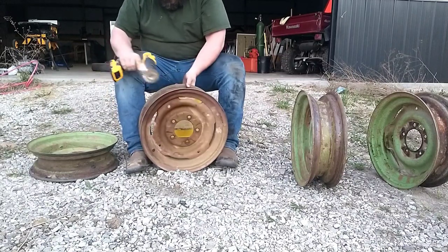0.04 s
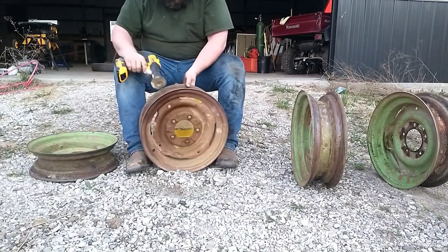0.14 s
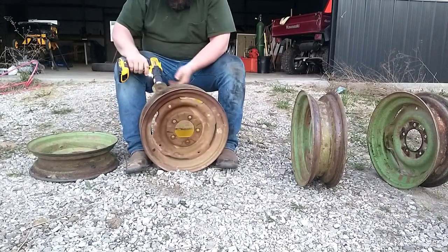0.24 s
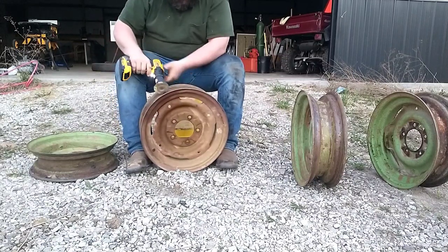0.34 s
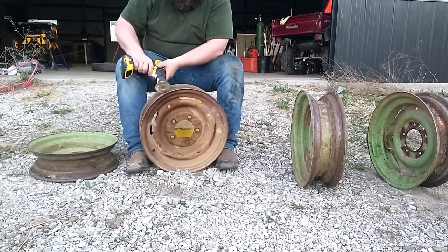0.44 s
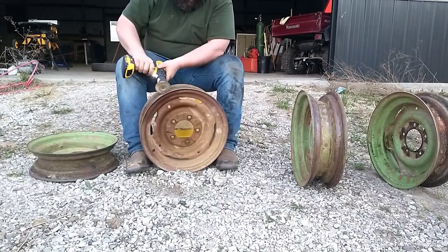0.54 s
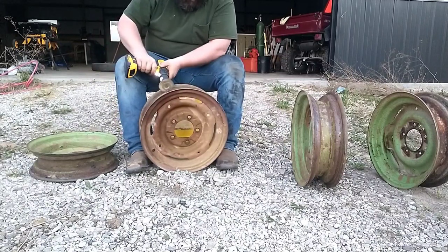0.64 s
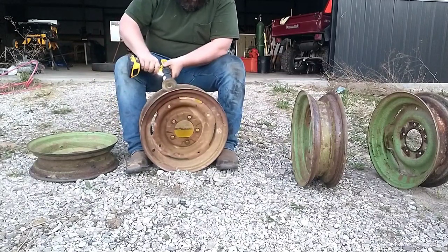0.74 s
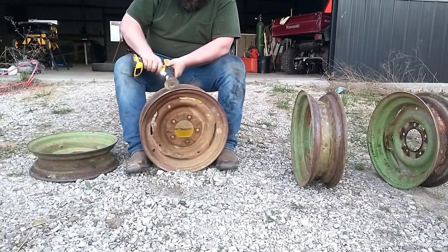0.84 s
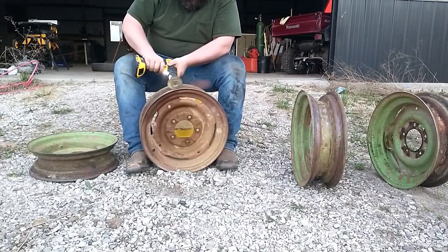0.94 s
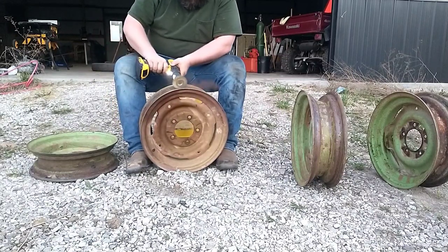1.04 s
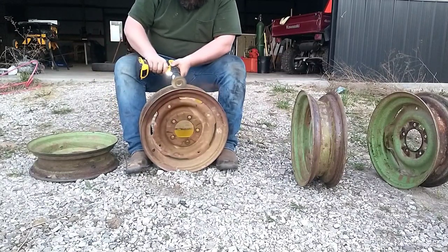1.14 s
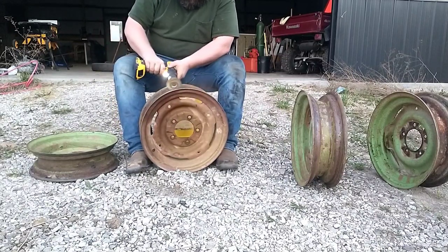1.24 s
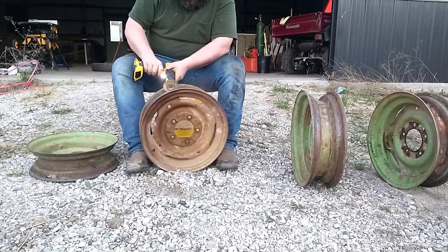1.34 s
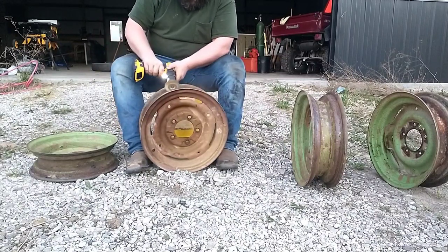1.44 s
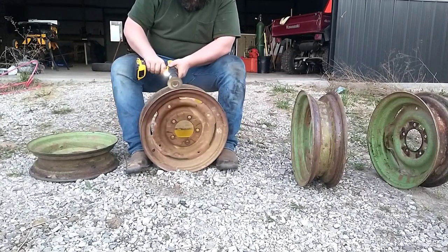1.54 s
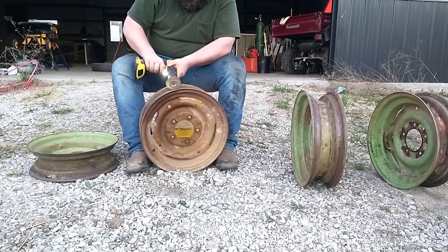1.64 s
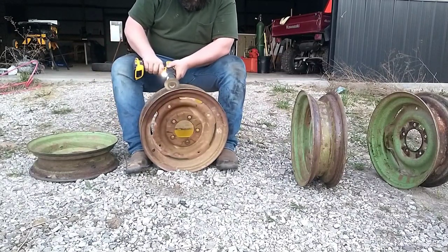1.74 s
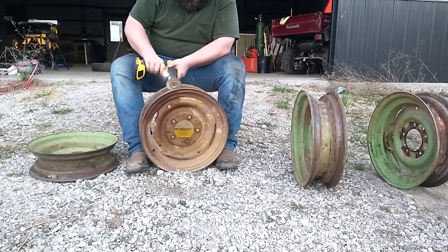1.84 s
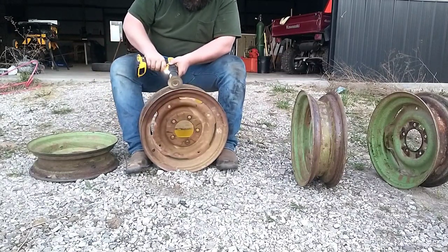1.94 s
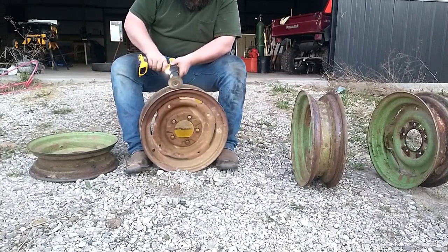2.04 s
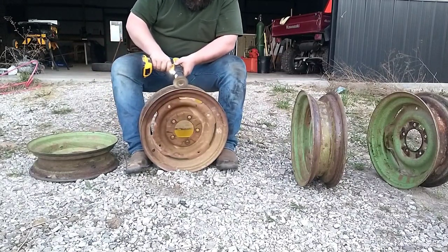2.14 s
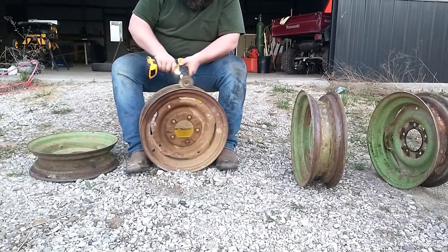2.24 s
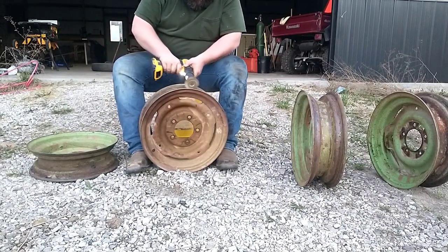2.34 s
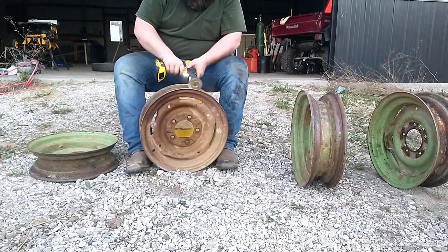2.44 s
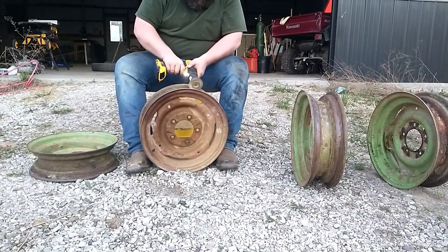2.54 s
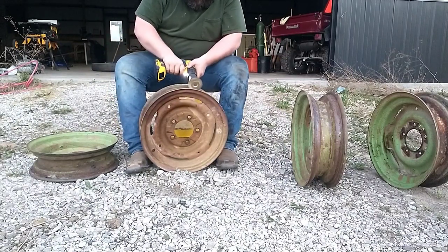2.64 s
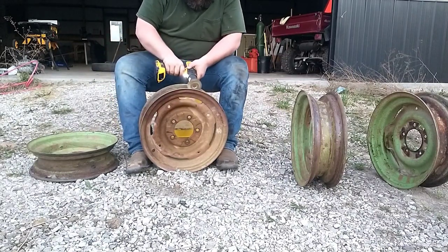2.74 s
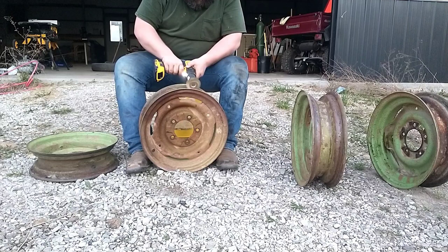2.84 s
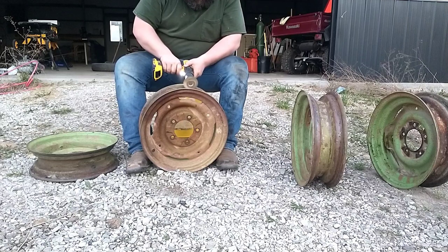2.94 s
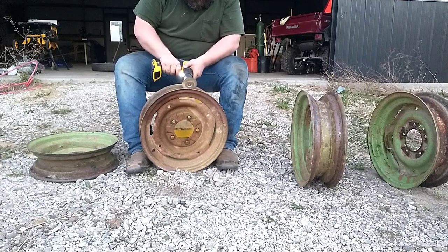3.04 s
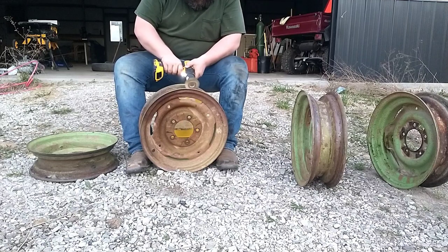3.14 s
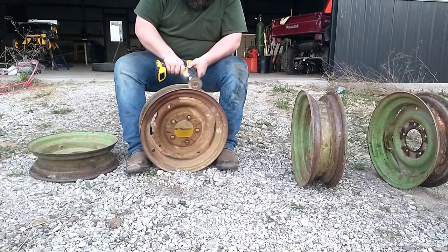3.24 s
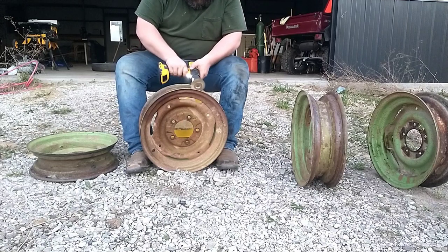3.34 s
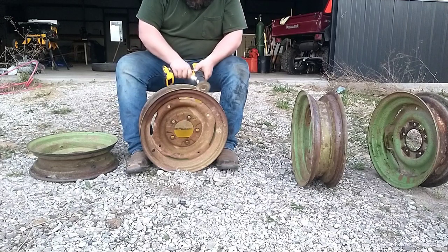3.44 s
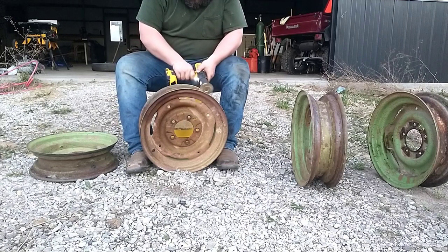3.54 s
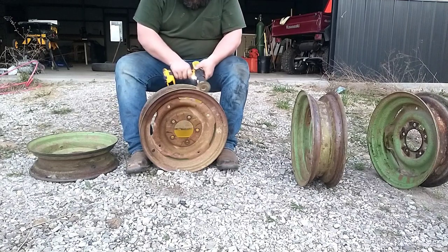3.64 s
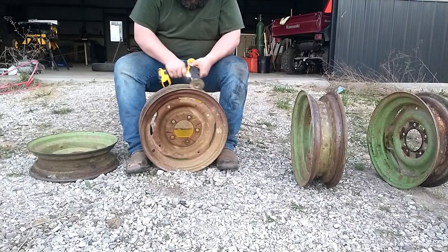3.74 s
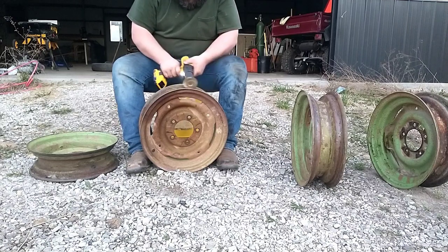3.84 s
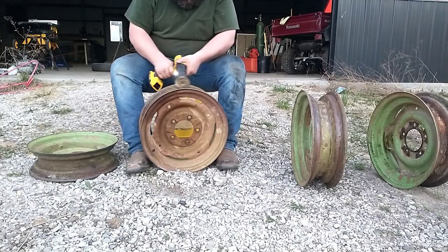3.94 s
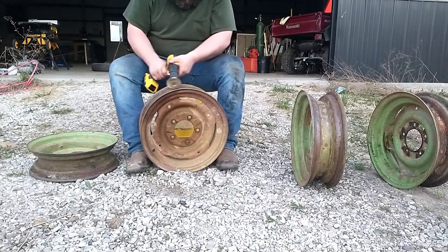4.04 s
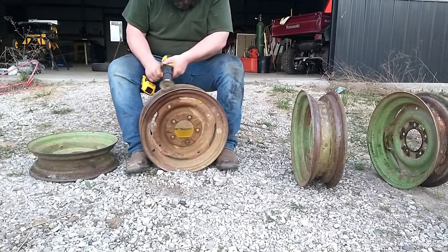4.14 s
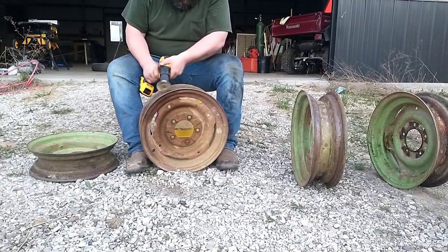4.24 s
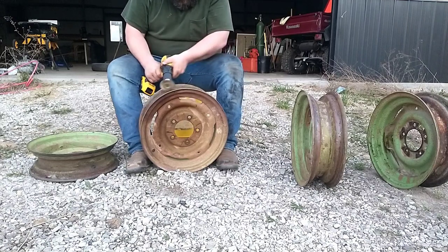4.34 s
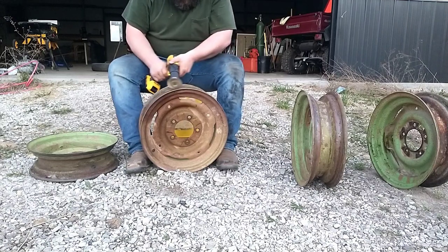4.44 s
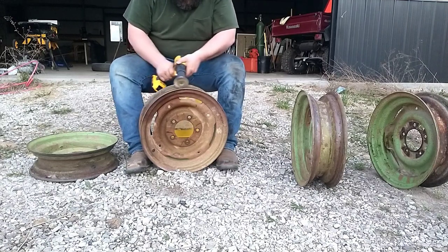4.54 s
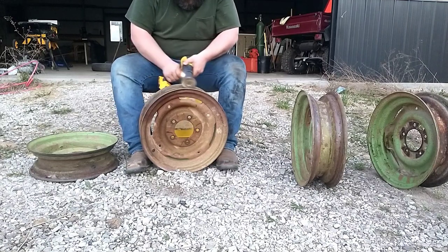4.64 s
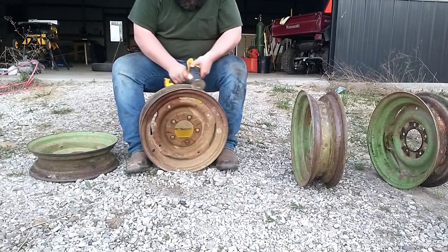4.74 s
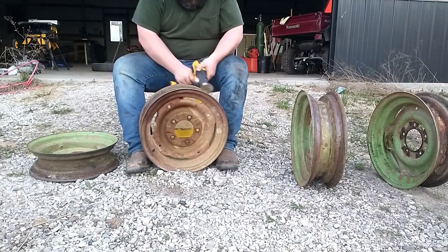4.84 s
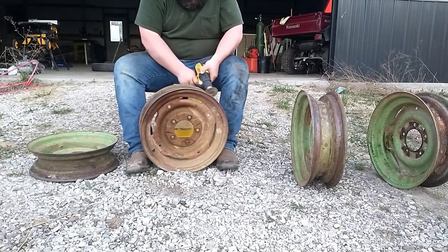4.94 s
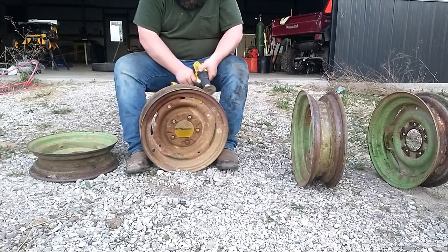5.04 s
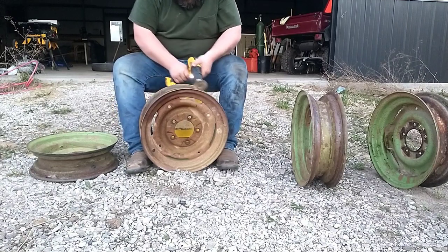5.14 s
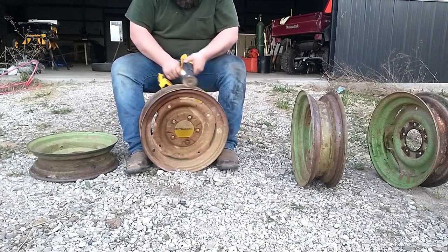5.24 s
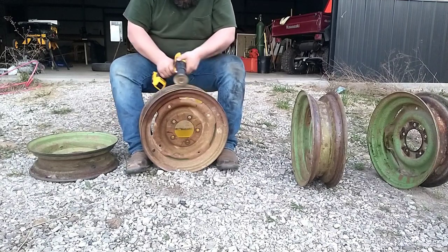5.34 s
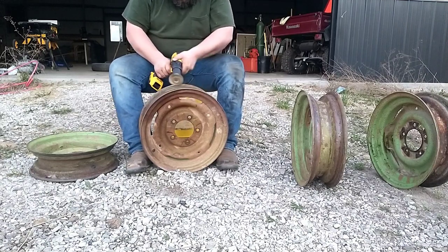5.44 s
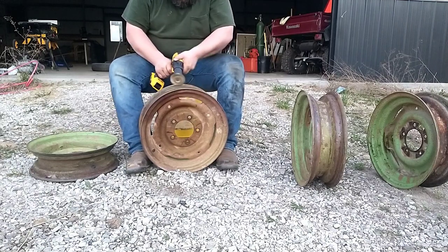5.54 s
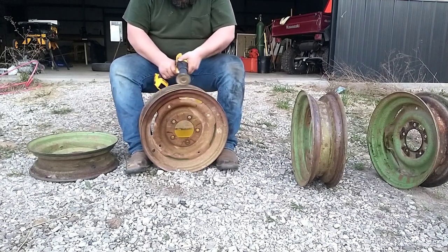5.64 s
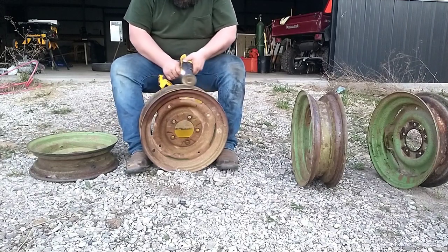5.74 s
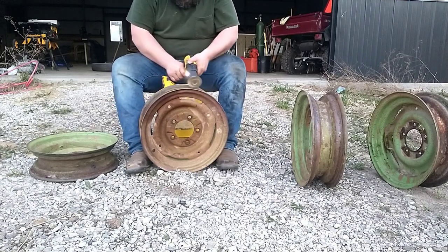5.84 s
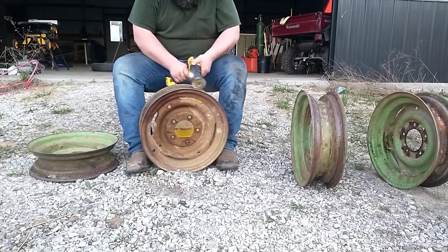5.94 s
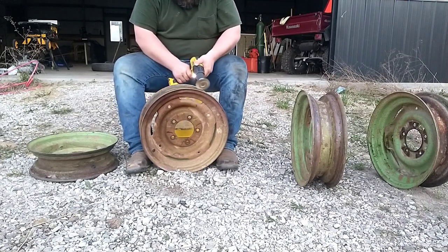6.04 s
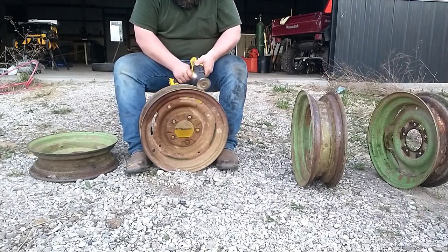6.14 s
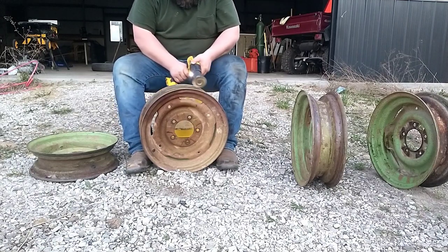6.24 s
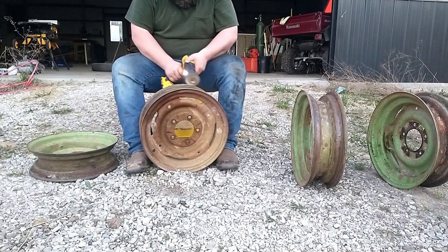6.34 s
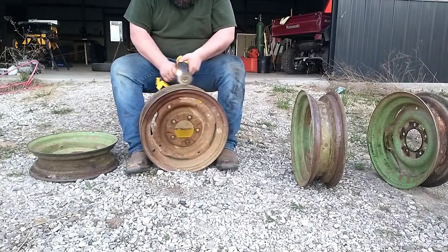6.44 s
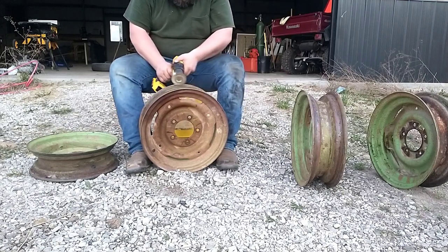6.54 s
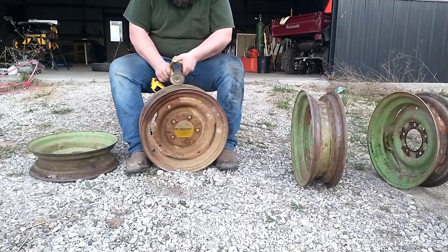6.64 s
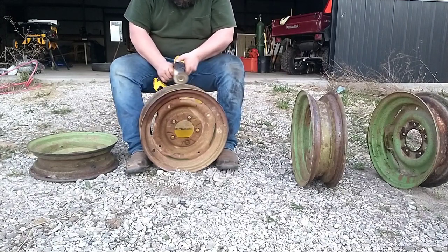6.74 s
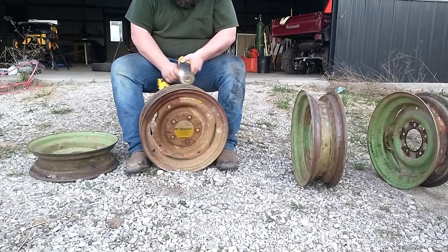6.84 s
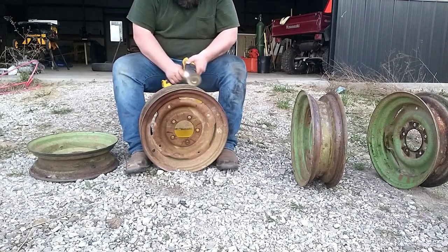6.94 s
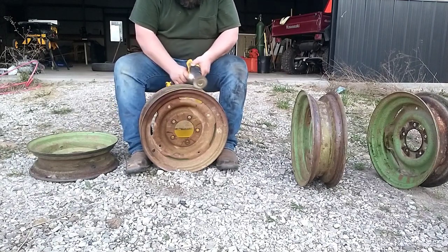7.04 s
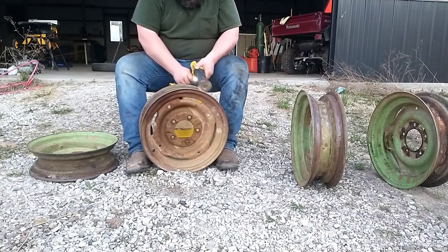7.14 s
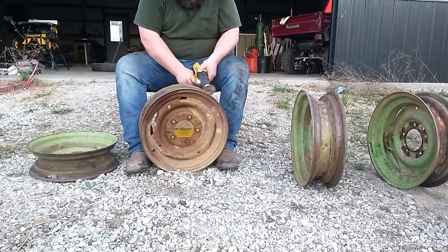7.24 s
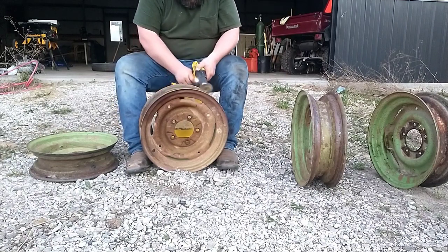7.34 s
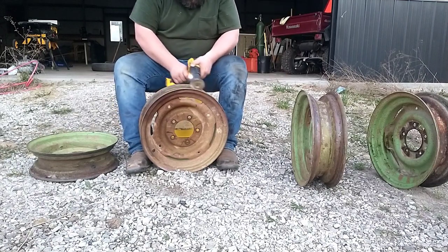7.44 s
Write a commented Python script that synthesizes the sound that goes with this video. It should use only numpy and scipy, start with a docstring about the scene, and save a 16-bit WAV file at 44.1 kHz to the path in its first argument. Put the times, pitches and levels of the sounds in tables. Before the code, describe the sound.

Brief metallic knocks, a trigger click, then a drill motor's high whine and harsh wire-bristle scratching on a steel rim, continuing to the end.

```python
"""A gravel yard in stereo: open-air murmur and a distant machine hum.
A wire brush knocks on a rusty steel wheel rim and sets its modes ringing; the trigger clicks.
A cordless drill's motor whines up, its tones riding the shaft, and sags as the brush loads it;
bristles scratch, as thousands of ticks shaped by spectrum, and keep the rim ringing.
A few more knocks fall early in the brushing; later, wind bumps the microphone as short low pulses."""
import sys
import numpy as np
from scipy import signal
from scipy.fft import rfft, irfft
from scipy.io import wavfile
from scipy.ndimage import uniform_filter1d

SR = 44100
rng = np.random.default_rng(int(sys.argv[2]) if len(sys.argv) > 2 else 0)


def persist_wave(psi):
    """Save psi, clipped to +-1, as 16-bit WAV."""
    counts = np.round(np.clip(psi, -1, 1) * 32767).astype(np.int16)
    wavfile.write(sys.argv[1], SR, np.atleast_2d(counts).T)


def boost_factor(decibels):
    """Convert a level in decibels to a linear amplitude factor."""
    exponent = np.asarray(decibels, float) / 20
    return 10 ** exponent


N = 329868
HZ = np.maximum(np.arange(N // 2 + 1) * SR / N, 1)   # frequency axis of a whole-length spectrum
TRIGGER_S = 0.616
CHUCK_PER_SHAFT = 0.0801   # chuck turns per shaft turn, through the gears

# speed the motor can hold against the brush: time_s, shaft_hz
LOADED_SPEED = [(.6, 313), (.93, 313), (1.04, 305.8), (1.15, 314.3), (1.36, 318.4), (1.62, 319.2),
                (1.67, 317.3), (1.82, 317), (2.03, 319.4), (2.14, 315.3), (2.26, 316.3), (2.52, 314.4),
                (2.66, 317.6), (2.73, 315.8), (2.95, 319.4), (3.14, 316.3), (3.3, 318.2), (3.44, 316.3),
                (3.7, 315.6), (3.77, 312.5), (3.98, 311.6), (4.07, 309.3), (4.19, 308.2), (4.37, 312.4),
                (4.54, 312), (4.73, 306.8), (4.8, 302.9), (4.87, 305.3), (4.98, 304.2), (5.15, 311.4),
                (5.3, 316), (5.56, 319), (5.66, 318.8), (5.8, 317.5), (5.85, 315.4), (6.15, 316.8),
                (6.34, 319), (6.52, 318.8), (6.8, 319.8), (6.89, 317.5), (7.13, 318.4), (7.34, 315.8),
                (7.48, 316)]
# weaker motor and gear tones, before the housing colours them: multiple of shaft rate, rms_db
WEAK_TONES = [(4, -36.5), (5, -40), (7, -46), (8, -45.5), (15, -34), (18, -31.5), (22, -43), (25, -34),
              (31, -23), (35, -43)]
# how the housing passes the weaker tones: pitch_hz, gain_db
HOUSING_GAIN = [(300, -33.5), (1000, -18), (1600, -6.5), (3000, -5.5), (6500, -0.5), (10000, -28.5),
                (11500, -14.5), (15000, -1)]
# tones that swell, one number each: multiple of shaft rate
WHINE_MULTIPLES = (10, 19, 20, 30, 16.05, 2)
# the same tones between swells, at full speed off the shell resonance: rms_db
WHINE_REST_DB = (-40, -36, -33.5, -43, -43.5, -65)
# swells as the tilting drill aims each tone at the listener, one list per tone:
# peak_s, peak_db, half_length_s
WHINE_SWELLS = [
    [(.97, -25.5, 0.26), (1.35, -19, 0.22), (1.6, -19.5, 0.21), (1.97, -19.5, 0.18), (2.26, -23.5, 0.11),
     (2.6, -23.5, 0.097), (2.92, -20, 0.14), (3.25, -20.5, 0.16), (2.4, -29, 1.1), (3.65, -22.5, 0.34),
     (3.97, -30, 0.13), (4.24, -28, 0.1), (4.46, -25.5, 0.15), (4.78, -27.5, 0.11), (5.2, -30, 0.33),
     (5.93, -30, 0.16), (6.28, -27, 0.33), (6.9, -52, .05), (7.25, -27.5, 0.67)],
    [(1.1, -22.5, 0.36), (1.46, -35, 0.11), (2.15, -25.5, 0.75), (2.44, -20.5, 0.14), (2.72, -21, .1),
     (2.91, -22, .09), (3.4, -18, 0.13), (3.83, -18, 0.23), (4.85, -19.5, 0.15), (5.07, -22, 0.16),
     (5.36, -22, 0.091), (5.87, -23, .07), (6.04, -16, 0.066), (6.32, -17.5, 0.27), (7.1, -23, 0.078),
     (7.28, -15, .08)],
    [(.825, -17, 0.027), (1.3, -26, 0.46), (1.9, -29, 0.066), (2.18, -25, 0.094), (2.62, -29, .05),
     (2.93, -28, 0.071), (3.2, -22.5, 0.03), (3.9, -28.5, 0.17), (4.33, -29.5, 0.33), (4.72, -26, 0.067),
     (5.0, -15, 0.12), (5.2, -24, 0.11), (5.6, -25.5, 0.12), (6.2, -20.5, 0.19), (6.39, -18.5, 0.073),
     (6.85, -24, 0.067), (7.18, -18, 0.074), (7.38, -20.5, 0.37)],
    [(.74, -29.5, 0.1), (.86, -28, 0.031), (1.15, -32, .2), (1.75, -35.5, 0.38), (2.15, -32, 0.12),
     (4.24, -27, 0.16), (4.5, -26.5, 0.21), (4.73, -27, 0.1), (5.5, -29.5, 0.29), (6.3, -40, 0.13),
     (6.67, -30.5, 0.025), (7.21, -36, 0.05)],
    [(.98, -29, 0.095), (2.4, -35, .3), (3.85, -29, 0.5), (4.75, -31, .2), (6.1, -30.5, .25),
     (7.2, -31, 0.16)],
    [(1.5, -59, .6), (3.15, -56.5, 0.97)],
]

# the hand on the drill: time_s, pressure_db, roll_db (from the brush's flank toward its tips)
HAND = [(.6, -2, 0), (.9, -0.5, 2.5), (1.3, 0, 0), (1.7, -0.5, -1), (2.2, 1, -1), (2.6, 0.5, 0.5),
        (2.95, -2, -1), (3.15, -0.5, -0.5), (3.5, -0.5, 2), (3.75, 1.5, 2), (4.1, 1.5, 0.5), (4.4, -0.5, 0),
        (4.75, 3, 1), (5.0, 4, 1), (5.55, -0.5, 0.5), (5.8, 1.5, 1.5), (6.3, 1.5, 0), (6.9, -1, 2.5),
        (7.2, 1.5, -.5), (7.48, 1.5, 3)]
# grind, scratch and sizzle in turn: rms_db before the hand, share of the roll (dB per dB),
# loss (dB per dB of missing speed)
BRISTLES = [(-33, -1.4, 3.5), (-26, 0.17, 2), (-26, 0.31, 1.5)]
# the plate's dull grind: pitch_hz, density_db (per Hz, relative)
GRIND_SPECTRUM = [(150, -21), (330, -49), (700, -24), (930, -20), (1150, -1), (1800, 3.5), (2400, 4.5),
                  (3000, 2), (4200, -10)]
# the bristle scratch: pitch_hz, density_db (per Hz, relative)
SCRATCH_SPECTRUM = [(2000, -48), (3000, -3.5), (4000, -0.5), (5000, 3.5), (6000, 2.5), (7000, -1.5),
                    (8500, -50)]
# the fine sizzle of tips: pitch_hz, density_db (per Hz, relative)
SIZZLE_SPECTRUM = [(5500, -30), (7200, 1), (8000, 1.5), (9500, -1), (10800, -2), (11500, -7.5), (13000, -7),
                   (15600, -8.5)]

# modes of the steel rim: pitch_hz, level_db (relative), t60_s
RIM_MODES = [(425, -24, .3), (608, -22, .4), (850, -21, .2), (1061, -7, .3), (1087, -3, .24), (1249, 0, .3),
             (1311, -3, .24), (1545, -2, .2), (1728, -10, .3), (1968, -9, .35), (2155, -3, .28),
             (2225, -7, .3), (2266, -11, .3), (2399, -6, .3), (2495, -4, .25), (2745, -6, .25),
             (2885, -10, .25), (3386, -2, .2), (3505, -8, .25), (3595, -9, .25), (3774, -8, .2),
             (4016, -7, .2), (4441, -6, .18), (4740, -7, .2), (5216, -10, .18), (5523, -8, .18),
             (6982, -9, .15), (7400, -9, .15)]
# the contact wanders round the rim: time_s, share_db (of the grind that feeds the modes),
# lean to the high modes (dB per octave)
CONTACT = [(.6, -43.5, -8), (.9, -27, -2.5), (1.3, -39.5, 4), (2, -37, -2), (2.8, -48, 11), (3.6, -38, 4),
           (4.4, -39, 1), (5.2, -36, 1.5), (5.9, -36, 4), (6.6, -35, 3), (7.48, -33.5, -1)]
# knocks and chatters on the rim, trigger click among them: start_s, level_db, length_s,
# low_hz, high_hz (band of the contact)
KNOCKS = [(.002, -43, 0.018, 735, 3840), (0.02, -37, 0.027, 1120, 1600), (0.155, -58, 0.031, 1000, 2600),
          (0.404, -72.5, 0.037, 870, 7060), (0.446, -48.5, 0.006, 1010, 11900),
          (0.615, -53, 0.0047, 700, 7000), (1.515, -37, 0.03, 407, 3080), (1.547, -32, 0.026, 1890, 5800),
          (1.559, -39, 0.018, 865, 3050)]

# open-air murmur: pitch_hz, density_db (per Hz, relative)
YARD_SPECTRUM = [(25, -36), (40, -15), (55, 0), (90, 8), (150, 2), (250, -6.5), (500, -7.5), (750, -7.5),
                 (1000, 1), (1400, -26), (2200, -17), (4000, -24.5), (7000, -25), (15500, -26.5)]
# open-air murmur: time_s, level_db
YARD_LEVEL = [(0, -51), (1.5, -48.5), (3, -47.5), (4.5, -49), (6, -50.5), (7.48, -49)]
# far machine hum: time_s, level_db
HUM_LEVEL = [(0, -56), (2.2, -69.5), (3.1, -55), (4.2, -50.5), (5.5, -52), (6.0, -69), (7.48, -67)]
# wind on the microphone: start_s, level_db (louder side), pitch_hz, left over right (dB)
WIND_BUMPS = [(2.559, -36, 88.8, -15), (2.716, -36, 108, 3), (3.082, -22.5, 156, -30),
              (3.149, -32, 97, -17), (3.327, -28, 88.8, 22), (3.493, -21, 108, -29),
              (3.987, -31, 89.6, -11), (6.386, -35, 105, -6.0), (7.052, -30.5, 104, -16)]

# stereo phase of the drill, brush and rim, left against right by pitch: pitch_hz, phase (radians)
STEREO_PHASE = [(100, -10), (450, 1.1), (1200, 0.68), (2500, 1), (3000, 0.56), (3500, 1.3), (5000, 1.82),
                (6050, 2.5), (6350, 0.5), (7300, -1.9), (15000, 3.5)]
# stereo level of the drill, brush and rim, left over right by pitch: pitch_hz, difference_db
STEREO_LEVEL = [(300, -4), (1100, 1), (2500, -0.5), (3500, -2), (5500, 0), (7300, 2.5), (8500, 3),
                (9500, 11), (10700, 1.5), (11500, 2), (14000, 7)]
# power share of noise common to both channels: pitch_hz, likeness (0 to 1)
LIKENESS = [(30, 0.6), (90, 1), (450, 0.65), (800, 0.46), (1300, 1), (2500, 1), (4000, 0.4), (5800, 0.67),
            (7000, 0.06), (8000, 0.14), (15000, 0)]


def motor():
    """Commutator, fan and gear tones ride the shaft; the off-centre chuck swings load and speed once a turn."""
    shaft_hz = shaft()
    turns = np.cumsum(shaft_hz * (1 + 0.00049 * drift(39.0))) / SR
    chuck = 2 * np.pi * CHUCK_PER_SHAFT * turns
    wobble = turns + 0.0034 * boost_factor(0.77 * drift(4.5)) * np.sin(chuck)
    effort_db = 40 * np.log10(shaft_hz / shaft_hz.max())

    tones = []
    for multiple, rest_db, swells in zip(WHINE_MULTIPLES, WHINE_REST_DB, WHINE_SWELLS):
        # the motor shell booms as a rising tone passes its resonance: 2150 Hz, 190 Hz half width
        shell_db = 15 * np.exp(-((multiple * shaft_hz - 2150) / 190) ** 2)
        tones.append((multiple, swelling(rest_db, swells) + 1.9 * effort_db + shell_db))
    for multiple, rms_db in WEAK_TONES:
        housing_db = at_hz(HOUSING_GAIN, multiple * shaft_hz)
        tones.append((multiple, rms_db + 1.15 * effort_db + housing_db + 2.4 * drift(6.0)))

    # the tones stutter more while the motor is still gathering speed
    flicker_db = np.minimum(1.3 - 0.5 * effort_db, 3.5)
    whine = 0
    for multiple, level_db in tones:
        level_db = level_db + flicker_db * drift(18)
        start, throb_start = rng.uniform(0, 2 * np.pi, 2)
        throb = 1 + 0.0074 * multiple * np.cos(chuck + throb_start)
        tone = np.sqrt(2) * np.sin(2 * np.pi * multiple * wobble + start)
        whine = whine + boost_factor(level_db) * throb * tone
    speed_db = effort_db / 2
    return whine * (np.arange(N) > TRIGGER_S * SR), turns, speed_db


def shaft():
    """Turns per second: an exponential spin-up from the trigger toward the loaded speed."""
    spin_up_s = 0.066   # time constant
    since = np.maximum(np.arange(N) / SR - TRIGGER_S, 1e-4)
    return in_time(LOADED_SPEED)[0] * (1 - np.exp(-since / spin_up_s))


def swelling(rest_db, swells):
    """Level in dB of a tone that rests low and rises in bell-shaped swells, summed as power."""
    s = np.arange(0, N, 64) / SR
    power = sum(boost_factor(db) ** 2 * np.exp(-2 * ((s - peak) / half) ** 2) for peak, db, half in swells)
    return 10 * np.log10(boost_factor(rest_db) ** 2 + np.interp(np.arange(N) / SR, s, power))


def brush(turns, speed_db):
    """Bristle tips tick on rust by the thousand, pressing harder once a chuck turn; they also drive the rim."""
    pressure_db, roll_db = in_time(HAND)
    # the rust is patchy, so each level also drifts
    grind_db, scratch_db, sizzle_db = (
        rms_db + pressure_db + share * roll_db + loss * speed_db + 0.7 * drift(2.7)
        for rms_db, share, loss in BRISTLES)
    on = np.arange(N) > TRIGGER_S * SR
    once_a_turn = 1 + 0.15 * np.cos(2 * np.pi * CHUCK_PER_SHAFT * turns)
    press = on * once_a_turn * boost_factor(0.6 * drift(12))
    grind = coloured(lambda: grains(9000, spread_db=1.0), GRIND_SPECTRUM) * boost_factor(grind_db)
    scratch = coloured(lambda: grains(11000, spread_db=3.0), SCRATCH_SPECTRUM) * boost_factor(scratch_db)
    sizzle = coloured(lambda: grains(20000, spread_db=2.5), SIZZLE_SPECTRUM)
    sizzle = sizzle * boost_factor(sizzle_db + 1.3 * drift(20))
    hiss = patchy(grind + scratch + sizzle, patchy_db=1.4)
    rubbing = press * boost_factor(grind_db) * grains(5000, spread_db=2.5)
    return press * hiss, rubbing


def grains(per_s, spread_db):
    """Random clicks of uneven size and sign; rms 1."""
    sizes = boost_factor(spread_db * np.minimum(rng.exponential(1, N), 5)) * rng.choice([-1, 1], N)
    return rms_one(sizes * (rng.random(N) < per_s / SR))


def patchy(x, patchy_db):
    """Louder and quieter patches, a few hundred Hz tall and a tenth of a second long."""
    _, _, cells = signal.stft(x, SR, nperseg=512)
    field = rng.standard_normal(cells.shape[1:])
    for axis, size in ((0, 9), (0, 9), (1, 11), (1, 11)):
        field = uniform_filter1d(field, size, axis=axis)
    return signal.istft(cells * boost_factor(patchy_db * rms_one(field)), SR, nperseg=512)[1][:, :N]


def rim(rubbing):
    """The moving contact favours other modes from moment to moment; each knock picks its own mix."""
    hits = knocks()
    share_db, lean_db = in_time(CONTACT)
    ringing = np.zeros((2, N))
    for k, (hz, level_db, t60) in enumerate(RIM_MODES):
        feed_db = share_db + lean_db * np.log2(hz / 1300) + 2.9 * drift(4.1)
        drive = np.append(rubbing * boost_factor(feed_db), np.zeros(4000))
        # knocks favour the rim's main ring
        favour_db = -4.5 * abs(np.log2(hz / 1250))
        for (at, contact), mix_db in zip(hits, rng.normal(0, 1.5, len(hits))):
            drive[at:at + 4000] += contact * boost_factor(mix_db + favour_db)
        # neighbouring modes radiate with opposite sign
        gain = (-1) ** k * boost_factor(level_db + rng.normal(0, 0.73, (2, 1)))
        ringing += gain * ring(drive[:N], hz, t60)
    return ringing + crack(hits)


def crack(hits):
    """Each knock's dry crack, with the many close modes blurred into a noisy tail."""
    contacts = np.zeros(N + 4000)
    for at, contact in hits:
        contacts[at:at + 4000] += contact
    # the tail falls 60 dB in 0.12 s
    tail = rng.standard_normal((2, 6000)) * boost_factor(-60 * np.arange(6000) / SR / 0.12)
    tail[:, 0] = 17.0   # the dry crack itself
    tail = signal.sosfilt(signal.butter(2, [800, 9000], "band", fs=SR, output="sos"), tail)
    return boost_factor(5.0) * signal.fftconvolve(contacts[None, :N], tail)[:, :N]


def knocks():
    """Each knock is a short chatter of contacts, coloured by what touches."""
    hits, age = [], np.arange(4000) / SR
    draws = rng.standard_normal((len(KNOCKS), 2, 4000))
    for (start_s, level_db, length_s, low_hz, high_hz), (size, chance) in zip(KNOCKS, draws):
        chatter = size * (np.abs(chance) > 1.8) * np.exp(-(age / length_s) ** 4)
        chatter[0] = 2.5   # first touch
        band = signal.butter(1, [low_hz, high_hz], "band", fs=SR, output="sos")
        hits.append((round(start_s * SR), boost_factor(level_db) * signal.sosfilt(band, chatter)))
    return hits


def stereo_image(x):
    """Phase and level between left and right vary with pitch, half of each set on either side."""
    half = boost_factor(at_hz(STEREO_LEVEL, HZ) / 2) * np.exp(0.5j * at_hz(STEREO_PHASE, HZ))
    return irfft(rfft(x) * np.array([half, 1 / half]), N)


def wind():
    """Wind bumps the microphone ports: short low sines under a bell, stronger on one side."""
    bumps, age = np.zeros((2, N)), np.arange(3000) / SR
    for start_s, level_db, hz, pan_db in WIND_BUMPS:
        bump = np.sin(2 * np.pi * hz * age) * np.exp(-((age - 0.014) / 0.0056) ** 2)
        at = round(start_s * SR)
        side_db = np.minimum(np.array([[pan_db], [-pan_db]]), 0)
        bumps[:, at:at + 3000] += boost_factor(level_db + side_db) * bump
    return bumps


def far_hum():
    """A far machine: partly shared noise through a 92.4 Hz resonance, wavering, stronger on the right."""
    waver_db = 2.5 * drift(2.5)
    drive = rng.standard_normal(N) + 0.41 * rng.standard_normal((2, N))
    hum = rms_one(ring(drive, 92.4, 0.47))
    return boost_factor(in_time(HUM_LEVEL)[0] + waver_db) * hum * boost_factor(np.array([[-1.8], [1.8]]))


def open_air():
    """The murmur of the yard: shaped noise with a drifting level."""
    level_db = in_time(YARD_LEVEL)[0] + 1.8 * drift(8.3)
    return boost_factor(level_db) * coloured(lambda: rng.standard_normal(N), YARD_SPECTRUM)


def coloured(source, spectrum):
    """Two channels: a shared draw plus one draw each, mixed by likeness and shaped; rms 1."""
    alike = np.clip(at_hz(LIKENESS, HZ), 0, 1)
    shared, left, right = (rfft(source()) for _ in range(3))
    pair = np.sqrt(alike) * shared + np.sqrt(1 - alike) * np.array([left, right])
    return rms_one(irfft(pair * boost_factor(at_hz(spectrum, HZ)), N))


def ring(drive, hz, t60):
    """A two-pole resonance: a unit click sets a decaying sine of starting height 1 ringing."""
    r, w = boost_factor(-60 / (t60 * SR)), 2 * np.pi * hz / SR
    return signal.lfilter([0, np.sin(w)], [1, -2 * r * np.cos(w), r * r], drive + 1e-18)


def drift(rate_hz):
    """Slow chance of spread 1: coarse noise through a double one-pole low-pass."""
    r = np.exp(-2 * np.pi * rate_hz * 40 / SR)   # one coarse step is 40 samples
    slow = signal.lfilter([1], [1, -2 * r, r * r], rng.standard_normal(N // 40 + 2002))[2000:]
    return np.interp(np.arange(N) / 40, np.arange(len(slow)), rms_one(slow))


def in_time(rows):
    """Columns of a curve table, one value per sample."""
    s, *columns = np.transpose(rows)
    return [np.interp(np.arange(N) / SR, s, column) for column in columns]


def at_hz(points, hz):
    """Read a spectrum on a log-frequency axis."""
    point_hz, value = np.transpose(points)
    return np.interp(np.log(hz), np.log(np.maximum(point_hz, 1)), value)


def rms_one(x):
    """Scale to rms 1."""
    return x / np.sqrt(np.mean(x ** 2) + 1e-20)


def scene():
    """Drill, brush and rim, spread in stereo, over the wind, hum and air of the yard."""
    whine, turns, speed_db = motor()
    hiss, rubbing = brush(turns, speed_db)
    work = whine + hiss + rim(rubbing)
    return stereo_image(work) + wind() + far_hum() + open_air()


def low_pass(x):
    """Removes everything above the highest recorded frequency."""
    return signal.sosfilt(signal.butter(12, 15940, fs=SR, output="sos"), x)


def record(dry):
    """The finished two-channel mix as it is stored."""
    return low_pass(dry)


dry = scene()
out = record(dry)
persist_wave(out)
```